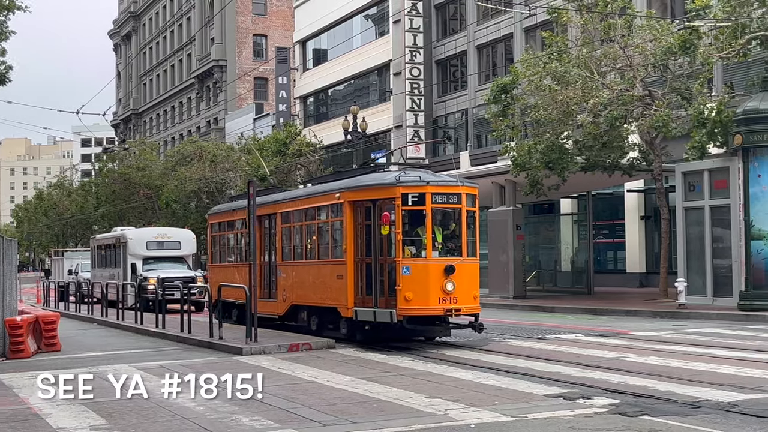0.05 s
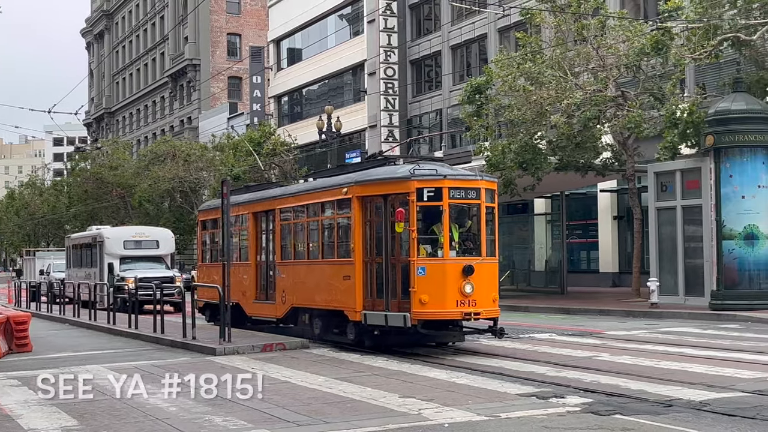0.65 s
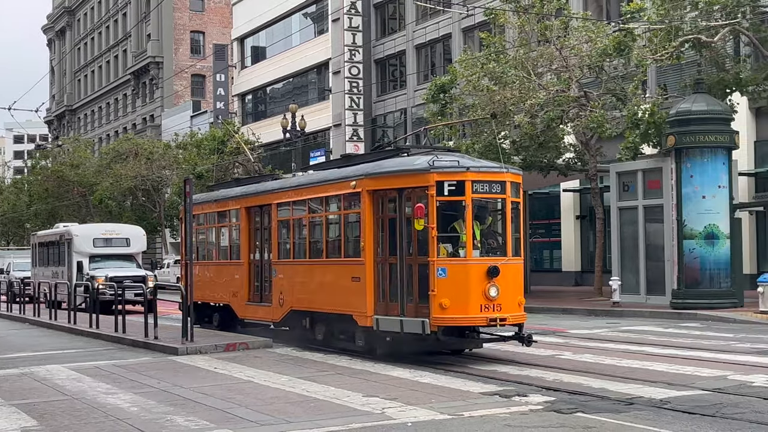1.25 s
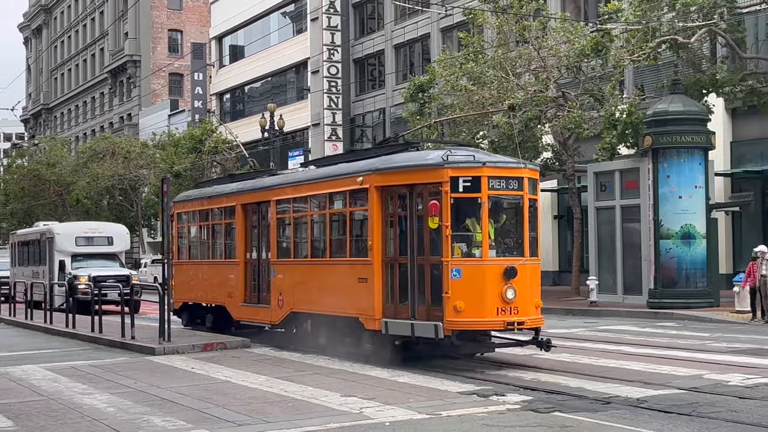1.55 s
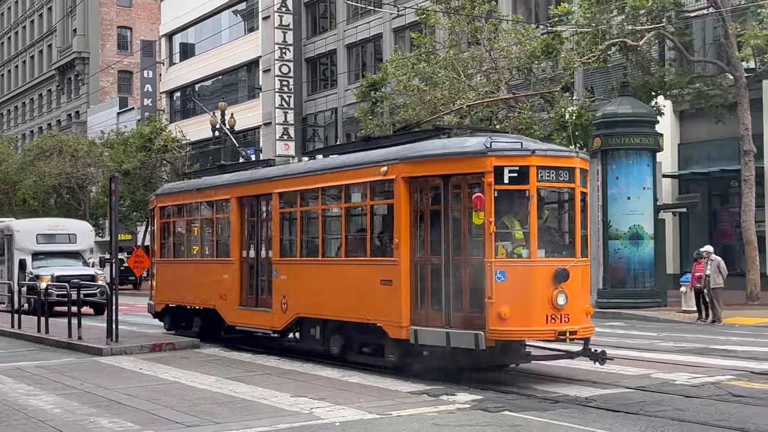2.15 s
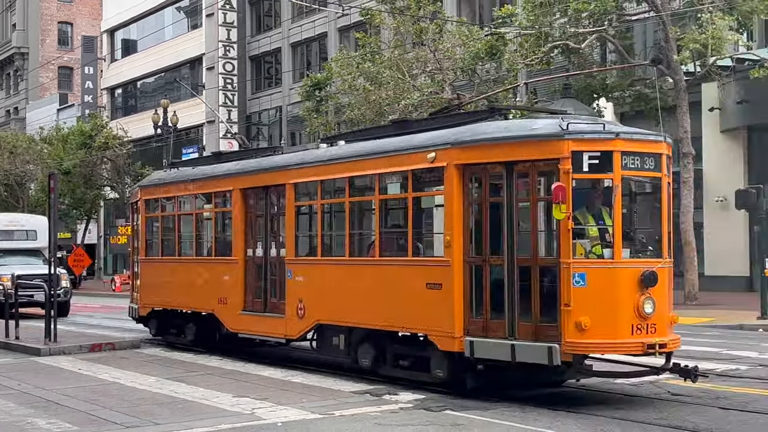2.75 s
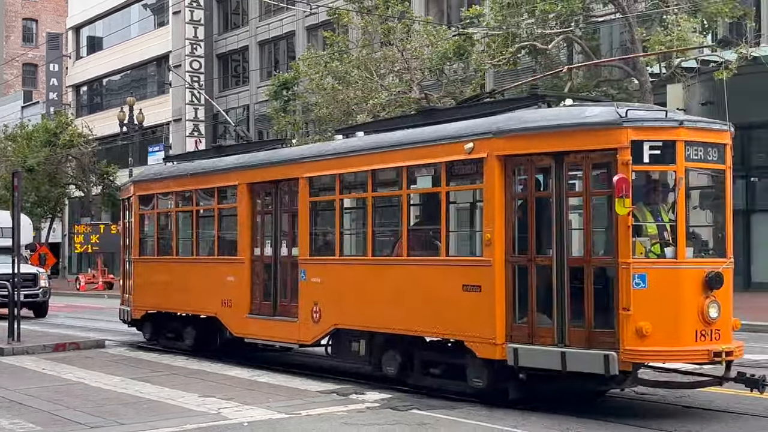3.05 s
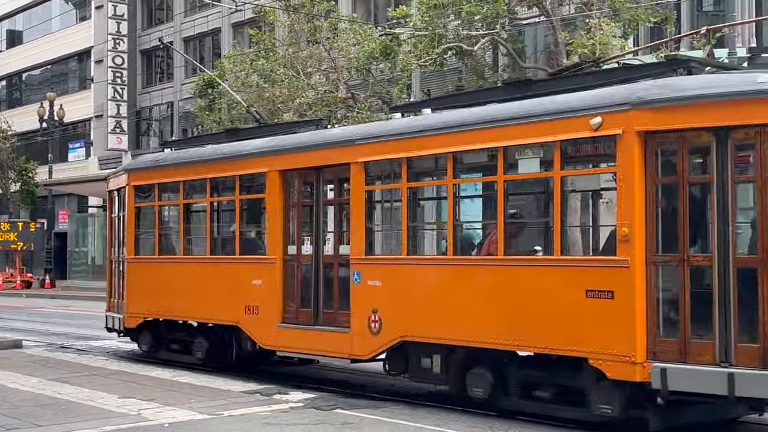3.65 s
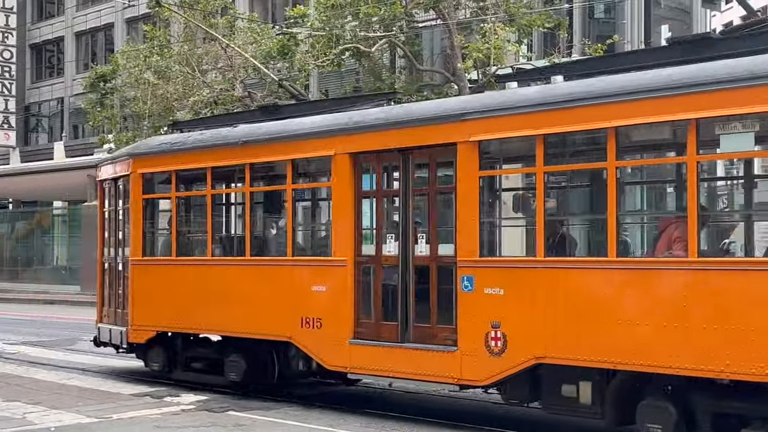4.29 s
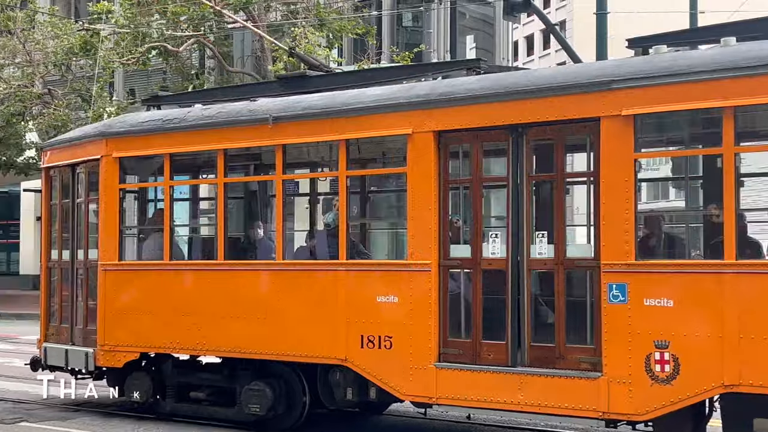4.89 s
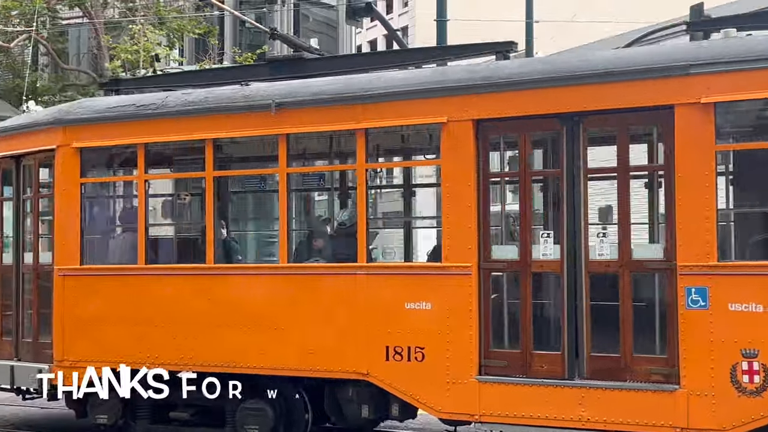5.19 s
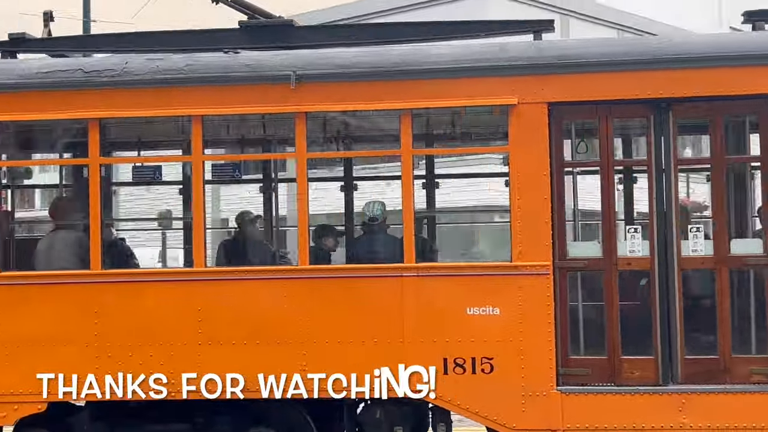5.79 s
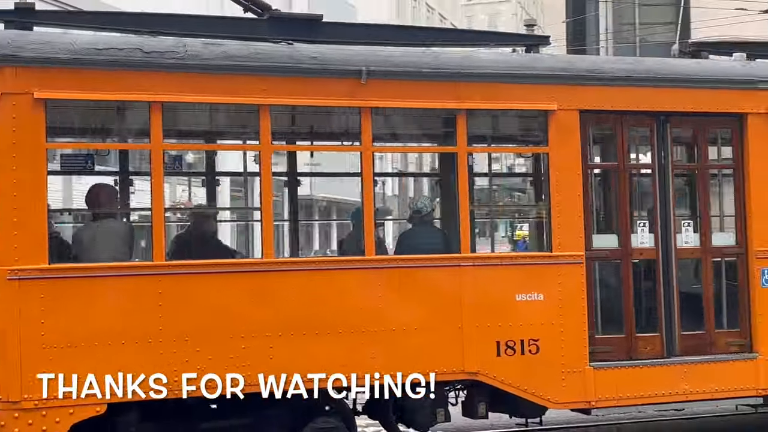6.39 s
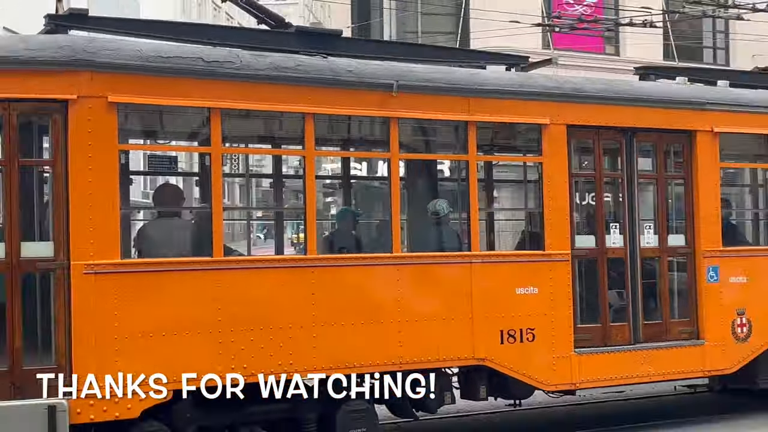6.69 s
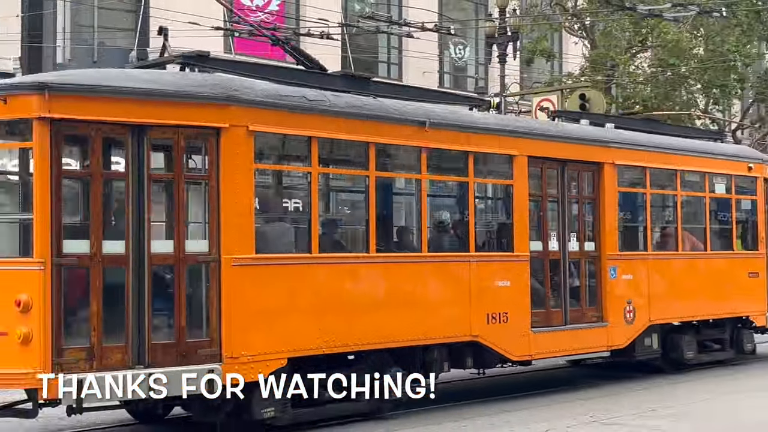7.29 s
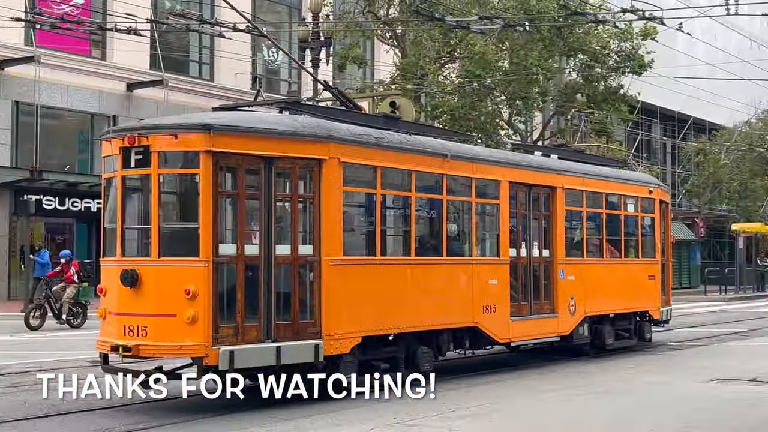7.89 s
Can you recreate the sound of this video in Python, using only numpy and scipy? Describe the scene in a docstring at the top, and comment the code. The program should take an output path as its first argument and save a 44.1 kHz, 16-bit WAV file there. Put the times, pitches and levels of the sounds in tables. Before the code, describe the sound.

Steel wheels roar, thump and clank along the rails as a humming streetcar approaches and passes on a city street.

```python
"""An old streetcar gathers speed and rolls past close by on a city street. Its rough steel wheels
roar, hiss and rattle on the rails, its body booms and bumps, and its drive hums. The wheels slam onto
loose track, grind over sand, jolt over pits and knock over rail joints; loose parts clank, and the
house fronts echo the blows. Behind it lie traffic noise, a faint, very high ticking and a few thin
squeaks of steel on steel. A microphone with two openings, left and right, listens."""
import sys
import numpy as np
from scipy import signal
from scipy.fft import rfft, irfft, next_fast_len
from scipy.io import wavfile
from scipy.ndimage import uniform_filter1d, map_coordinates

SR = 44100
rng = np.random.default_rng(int(sys.argv[2]) if len(sys.argv) > 2 else 0)


def log_audio(samples):
    """Write samples as a 16-bit WAV file to the path given in sys.argv[1]."""
    # one column per channel
    frames = np.atleast_2d(samples).T
    # limit to full scale, then quantise
    limited = np.clip(frames, -1, 1)
    pcm = np.round(limited * 32767).astype(np.int16)
    wavfile.write(sys.argv[1], SR, pcm)


N = 358974

# Levels in all tables are relative. A fade_s is the time a sound takes to fall by 60 dB.
# the tone of a blow's low thump, middle clang and high crack: pitch_hz, level_db
THUMP_TONE = [(25, -32), (60, -11), (125, 8), (220, -3), (400, -1.5), (900, -61)]
CLANG_TONE = [(150, -7.5), (350, 0.5), (700, 3), (1100, -1.5), (1700, -11.5), (2600, -23.5), (5000, -40)]
CRACK_TONE = [(700, -24), (1300, 4), (2100, 2), (3000, 3.5), (4500, -2.5), (6500, -6), (9000, -18),
              (15000, -39)]
# the car gathers speed, then coasts: time_s, speed_m_per_s
CAR_SPEED = [(0, 2.3), (3.78, 4.75), (5.1, 6.2), (6.5, 6.5), (7.2, 6.25), (8.14, 6.15)]


def amp(db):
    """Turn decibels into a number to multiply a sound by."""
    return 10 ** (np.asarray(db) / 20)


def unit(x):
    """Scale a signal to an average strength (rms) of 1."""
    return x / np.sqrt(np.mean(x ** 2) + 1e-20)


def at_pitch(points, hz):
    """Read between the rows of a (pitch_hz, value) table, with octaves evenly spaced."""
    pitches, values = np.transpose(points)
    return np.interp(np.log(hz + 1), np.log(pitches + 1), values)


def curves(rows):
    """Turn each column after the time into one value per sample."""
    times, *columns = np.transpose(rows)
    return [np.interp(np.arange(N) / SR, times, column) for column in columns]


def wobble(rate):
    """A smooth curve through `rate` random values a second."""
    return map_coordinates(rng.standard_normal(int(N * rate / SR) + 4), [np.arange(N) * rate / SR])


def filtered(x, response):
    """Multiply each frequency in x by response(hz)."""
    size = x.shape[-1]
    padded = next_fast_len(size + 1024)
    return irfft(rfft(x, padded) * response(np.fft.rfftfreq(padded, 1 / SR)), padded)[..., :size]


def add(track, start_s, sound):
    """Mix a sound into a track at start_s."""
    part = track[..., max(round(start_s * SR), 0):][..., :sound.shape[-1]]
    part += sound[..., :part.shape[-1]]


def coloured(pair, tone, ring=0):
    """Shape two noises into left and right with a given tone; ring is how much the steel resonates."""
    # resonances of the wheels, trucks (wheel frames) and rails: pitch_hz, width_hz, lift_db
    resonances = [(202, 140, 3), (381.5, 62, 3.5), (516, 17, 3), (660, 175, 3.5), (873, 113, 5.5),
                  (1034, 28, 6), (1492, 155, 8.5), (1860, 45, 1), (2420, 760, 3), (2984, 99, 5.5),
                  (4020, 360, 4.5), (5260, 260, 3)]
    # how alike left and right are: pitch_hz, likeness (0 to 1)
    likeness = [(150, 0.99), (420, 0.87), (620, 0.56), (1300, 0.33), (2000, 0.7), (2600, 0.94), (4000, 1),
                (5200, 1), (6500, 0.23), (8400, 1), (12000, 1)]

    def response(hz):
        lift_db = sum(db / (1 + ((hz - centre) / (width / 2)) ** 2) for centre, width, db in resonances)
        spread = np.arccos(np.clip(at_pitch(likeness, hz), 0, 1)) / 2
        return amp(at_pitch(tone, hz) + ring * lift_db) * [np.cos(spread), np.sin(spread)]
    mid, side = filtered(pair, response)
    return unit(np.array([mid + side, mid - side]))


def dying(pair, fades):
    """Let each frequency fade at its own speed, given rows of (pitch_hz, fade_s)."""
    hz, t, bands = signal.stft(pair, SR, nperseg=256)
    faded = bands * amp(-60 * t / at_pitch(fades, hz)[:, None])
    return signal.istft(faded, SR, nperseg=256)[1][:, :pair.shape[1]]


def grit(per_s, spread_db, life_s):
    """Countless tiny contacts of uneven size, each a burst of noise lasting about life_s."""
    contacts = rng.random(N) < per_s / SR
    sizes = contacts * amp(spread_db * np.minimum(rng.exponential(size=N), 4))
    power = signal.lfilter([1], [1, -np.exp(-1 / (life_s * SR))], sizes ** 2)
    return unit(np.sqrt(power) * rng.standard_normal((2, N)))


def patchy(pair, depth_db):
    """As the wheels turn, narrow bands of their sound grow and shrink."""
    bands = signal.stft(pair, nperseg=1024)[2]
    swells = uniform_filter1d(rng.standard_normal(bands.shape[1:]), size=2, axis=0)  # smooth over pitch
    swells = uniform_filter1d(swells, size=16, axis=1)  # and over time
    return signal.istft(bands * amp(depth_db * unit(swells)), nperseg=1024)[1][:, :N]


def blow(tone, ring, attack_s, stretch):
    """One hit sets the truck ringing as a burst of noise; stretch multiplies its fade times."""
    # how long the truck rings before stretching: pitch_hz, fade_s
    truck_fades = [(100, 0.2), (400, 0.35), (1200, 0.24), (4000, 0.21), (12000, 0.16)]
    t = np.arange(SR // 5) / SR
    burst = coloured(rng.standard_normal((2, len(t))), tone, ring)
    fades = [(hz, fade_s * stretch) for hz, fade_s in truck_fades]
    return dying(burst, fades) * (1 - np.exp(-t / attack_s))


def ringing(notes, attack_s, strongest_hz):
    """Struck steel rings its own notes, a little differently each time; rolling contact blurs them."""
    t = np.arange(SR // 4) / SR
    hz, db, fade_s = np.transpose(notes)[:, :, None]
    db = db + 6 * np.exp(-(np.log2(hz / strongest_hz) / .08) ** 2)  # lift notes near strongest_hz
    hz = hz * (1 + 0.009 * rng.standard_normal(hz.shape))  # slightly out of tune
    blur_hz = 4 + .009 * hz
    drift = np.cumsum(rng.standard_normal((len(notes), len(t))), 1) * np.sqrt(2 * np.pi * blur_hz / SR)
    phase = 2 * np.pi * (hz * t + rng.random(hz.shape)) + drift
    loudness = amp(db + 1.6 * rng.standard_normal(hz.shape) - 60 * t / fade_s)
    return (loudness * np.sin(phase)).sum(0) * (1 - np.exp(-t / attack_s))


def travelled():
    """Metres that the middle of the car has covered, at each sample."""
    return np.cumsum(curves(CAR_SPEED)[0]) / SR


def passing(falloff, doubling_db, worn_db=0):
    """The two trucks are louder when near, with each doubling of speed, and on a worn stretch of rail."""
    truck_spacing_m, mic_at_m, mic_distance_m = 7.1, 22.8, 7.3
    worn_at_m, worn_half_length_m = 18.25, 1.9
    place_m = travelled() + np.array([[.5], [-.5]]) * truck_spacing_m
    nearness = mic_distance_m / np.hypot(mic_distance_m, place_m - mic_at_m)
    on_worn_rail = np.exp(-((place_m - worn_at_m) / worn_half_length_m) ** 6)
    trucks = nearness ** falloff * amp(worn_db * on_worn_rail)
    doublings = np.log2(curves(CAR_SPEED)[0] / 6.4)  # counted from a cruising speed of 6.4 m/s
    return np.sqrt(np.mean(trucks ** 2, axis=0)) * amp(doubling_db * doublings)


def rolling():
    """Rough wheels shake the body, roar, make the rails hiss and rattle over small pits."""
    # the tone of the body's boom, the wheels' roar and their rattle: pitch_hz, level_db
    boom_tone = [(20, -36), (32, -30), (45, -12), (65, -2), (110, 1), (150, -1), (200, -1.5), (290, -11.5),
                 (600, -80)]
    roar_tone = [(70, -55), (170, -3), (300, 0), (450, -1), (610, -10.5), (800, -12), (1200, -22),
                 (2000, -39), (4000, -45)]
    rattle_tone = [(250, -19), (550, 7), (800, -3), (1300, -8), (2400, -13), (3500, -28), (8000, -42)]
    # the rails' hiss, with a gap in the top treble that is not the rails' own: pitch_hz, level_db
    hiss_with_gap = [(500, -29), (1300, 5.5), (1700, -3.5), (2100, 3), (3300, -5), (5000, -8),
                     (7000, -10.5), (9500, -33), (13000, -20), (15000, -43)]
    load = wobble(14)  # the weight on the wheels keeps changing
    boom_gain = amp(-22 + 0.74 * wobble(11))
    boom = boom_gain * coloured(grit(per_s=900, spread_db=1.8, life_s=0.0026), boom_tone, ring=0.38)
    roar_grit = patchy(grit(per_s=700, spread_db=0.85, life_s=0.014), depth_db=1.5)
    roar = amp(-18 + 1.4 * load) * coloured(roar_grit, roar_tone, ring=1.04)
    hiss_grit = patchy(grit(per_s=900, spread_db=5.1, life_s=0.019), depth_db=2)
    hiss = amp(-34 + 0.24 * load) * coloured(hiss_grit, hiss_with_gap, ring=1.5)
    rattle = amp(-44) * coloured(grit(per_s=90, spread_db=2.6, life_s=.003), rattle_tone, ring=0.94)
    return (boom * passing(falloff=0.69, doubling_db=3, worn_db=4.5)
            + roar * passing(falloff=0.82, doubling_db=7, worn_db=3.5)
            + hiss * passing(falloff=0.74, doubling_db=6.5)
            + rattle * passing(falloff=1.2, doubling_db=12, worn_db=16))


def traffic():
    """The steady wash of the city, and the unsteady drone of an engine in it."""
    # the tone of the wash: pitch_hz, level_db
    wash_tone = [(25, -28), (42, -3.5), (62, 6), (110, -3), (170, -8), (300, -17), (700, -16.5),
                 (1200, -14.5), (1750, -11.5), (2300, -22), (4000, -28), (15000, -57)]
    wash = amp(-31 + 1.1 * wobble(2.9)) * coloured(rng.standard_normal((2, N)), wash_tone)
    drone_hz = 106 + 2.28 * wobble(14)
    drone = amp(-33.5 + 3.6 * wobble(4.9)) * np.sin(2 * np.pi * np.cumsum(drone_hz) / SR)
    return wash + drone


def gear_tone(rows, width_hz):
    """A band of noise on a gliding pitch, swelling with the uneven load on the gears."""
    hz, db = curves(rows)
    flutter = wobble(width_hz) + 1j * wobble(width_hz)  # random in both strength and phase
    band = np.real(flutter * np.exp(2j * np.pi * np.cumsum(hz) / SR))
    load = amp(2 * wobble(11))
    return amp(db) * unit(load * band)


def drive():
    """The drive growls, hums and whines as the car runs up to speed."""
    # its low, middle and high tone: time_s, pitch_hz, level_db
    growl = [(2.8, 183, -45), (3.8, 203, -27), (4.6, 217, -27), (6.1, 214.7, -28), (8.14, 205.7, -36)]
    hum = [(2.4, 346.5, -54), (3.2, 377.2, -32.5), (4.6, 438.1, -29), (5.6, 455, -24.5),
           (6.5, 430.6, -29.5), (7.7, 425, -28.5), (8.14, 418, -30)]
    whine = [(1.0, 639, -70), (1.5, 646, -40), (3.0, 681, -43), (3.5, 701.4, -34), (5.4, 745, -32.5),
             (6.2, 719, -34)]
    return gear_tone(growl, width_hz=55) + gear_tone(hum, width_hz=70) + gear_tone(whine, width_hz=110)


def ticking():
    """Very high ticks, about eight a second, travel with the car and are loudest as it goes by."""
    # the pace of the ticking: time_s, ticks_per_s
    pace = [(0, 8.2), (2.3, 8.2), (3, 8.07), (4.2, 7.88), (5.2, 8.08), (8.14, 7.99)]
    # the tone of a tick: pitch_hz, level_db
    tick_tone = [(5000, -57), (9000, -37), (11000, 3.5), (12600, 3), (14000, -6), (15500, 1.5)]
    nearest_at_m, distance_m = 23.4, 8.3
    pulses, t = np.zeros(N), np.arange(SR // 10) / SR
    pulse = amp(-60 * t / 0.13) * (1 - np.exp(-t / 0.00067))
    count = np.cumsum(curves(pace)[0]) / SR - .26
    for start_s in np.flatnonzero(np.diff(np.floor(count))) / SR:  # a tick at each whole number
        add(pulses, start_s - .002, pulse)
    nearness = distance_m / np.hypot(distance_m, travelled() - nearest_at_m)
    return pulses * amp(-34.5) * nearness ** 1.9 * coloured(rng.standard_normal((2, N)), tick_tone)


def track_slams():
    """Four axles in turn hit a loose piece of track, which thumps, clanks hollowly and rebounds twice."""
    # one slam for each axle: start_s, clang_db, thump_db, crack_db, strongest_hz
    slams = [(0.243, -13.5, -20.5, -36.5, 1075), (0.85, -16, -15.5, -32, 890), (2.461, -7, -15, -26, 1130),
             (2.859, -8, -13.5, -25, 757)]
    # the notes of the loose track: pitch_hz, level_db, fade_s
    track_notes = [(92, 3.5, 0.24), (380.6, -2, 0.3), (583, -2, 0.26), (660, 4, 0.12), (747.5, -3, 0.18),
                   (877, -9, 0.19), (1128, -6, 0.18), (1680, -12.5, 0.34), (1816, -12, 0.29),
                   (1910, -16.5, 0.26)]
    rebound_s, rebound_db = .032, -9
    track = np.zeros((2, N))
    for start_s, clang_db, thump_db, crack_db, strongest_hz in slams:
        thump = blow(THUMP_TONE, ring=0.31, attack_s=0.0047, stretch=1.35)
        add(track, start_s + 0.00304, amp(thump_db + 1) * thump)
        for bounce in range(3):
            hit_s, gain = start_s - .001 + bounce * rebound_s, amp(bounce * rebound_db)
            crack = amp(crack_db) * blow(CRACK_TONE, ring=0.6, attack_s=0.00067, stretch=1)
            clang = amp(clang_db - 6) * blow(CLANG_TONE, ring=0.16, attack_s=0.0021, stretch=1.01)
            notes = amp(clang_db - 10) * ringing(track_notes, attack_s=0.0035, strongest_hz=strongest_hz)
            for sound in (crack, clang, notes):
                add(track, hit_s, gain * sound)
    return track


def street_echo(sound):
    """The house fronts throw back a late, smeared echo."""
    # how long the street rings: pitch_hz, fade_s
    street_fades = [(100, 0.45), (1000, 1), (4000, 1), (12000, 0.29)]
    even_noise = coloured(rng.standard_normal((2, SR)), [(100, 0), (10000, 0)])
    tail = dying(even_noise, street_fades)
    echo = np.zeros((2, N))
    add(echo, .03, signal.fftconvolve(sound.mean(0)[None], tail / np.linalg.norm(tail[0]), axes=1))
    return echo


def body_bumps():
    """The heavy body bumps on its springs and swings for a few cycles."""
    # the bumps: start_s, level_db
    bumps = [(1.187, -15), (2.866, -12.5), (3.104, -18), (3.41, -15.5), (5.057, -14), (7.745, -12.5),
             (7.985, -14)]
    pitch_hz, attack_s, fade_s = 70.3, 0.0066, 0.2
    track, t = np.zeros(N), np.arange(SR // 3) / SR
    swing = amp(-60 * t / fade_s) * (1 - np.exp(-t / attack_s)) * np.sin(2 * np.pi * pitch_hz * t)
    for start_s, db in bumps:
        add(track, start_s, amp(db + 3) * swing)
    return track


def sand():
    """A gritty grinding swells and fades as the wheels crush sand on the rails."""
    # the tone of the grinding: pitch_hz, level_db
    sand_tone = [(80, 2), (160, 12), (300, 3), (700, -3), (1500, -8), (3000, -20.5), (8000, -48)]
    start_s, rise_s, hold_s, fall_s = 1.22, 0.69, 0.16, 0.97
    t = np.arange(N) / SR - start_s
    rise = np.clip(t / rise_s, 0, 1)
    fall = np.clip(1 - (t - rise_s - hold_s) / fall_s, 0, 1)
    return amp(-27) * rise * fall * coloured(grit(per_s=400, spread_db=1.2, life_s=0.0054), sand_tone)


def rail_pits():
    """A pit in the rail, or a clump of sand, gives the wheel one short, dry jolt."""
    # the jolts: start_s, level_db; the first comes as the wheels crush a clump of sand, the rest at the deepest
    # pits
    pits = [(1.93, -20.5), (5.245, -18), (5.368, -17), (5.475, -15), (5.588, -17), (6.507, -20.5)]
    track = np.zeros((2, N))
    for start_s, db in pits:
        crack = amp(db - 21) * blow(CRACK_TONE, ring=1.2, attack_s=.001, stretch=.4)
        clang = amp(db) * blow(CLANG_TONE, ring=0.62, attack_s=0.0019, stretch=0.27)
        thump = amp(db + 4) * blow(THUMP_TONE, ring=0.63, attack_s=.002, stretch=0.45)
        add(track, start_s, crack + clang + thump)
    return track


def squeaks():
    """Each slip of steel on steel sings a brief, rough, falling tone."""
    # the slips: start_s, level_db
    slips = [(2.61, -46), (2.705, -45), (2.873, -49), (3.65, -52), (3.91, -46), (4.05, -49), (4.531, -52)]
    pitch_hz, fall_hz, length_s = 13450, 700, .05
    track, progress = np.zeros(N), np.linspace(0, 1, int(length_s * SR))
    for start_s, db in slips:
        glide_hz = pitch_hz + 120 * rng.standard_normal() - fall_hz * progress
        rough_hz = glide_hz + 900 * rng.standard_normal(SR)[:len(progress)]
        tone = np.sin(2 * np.pi * np.cumsum(rough_hz) / SR)
        add(track, start_s, amp(db) * np.sin(np.pi * progress) * tone)
    return track


def rail_joints():
    """Each wheel cracks on the rail end, the steel clangs and rings, and the truck lands with a thump."""
    # the knocks, mostly in pairs: start_s, clang_db, thump_db, crack_db, strongest_hz
    knocks = [(3.727, -22, -9.5, -42, 2310), (3.84, -20.5, -8, -43, 1690), (4.156, -24, -9.5, -40, 2955),
              (5.057, -17.5, -12.5, -38, 2310), (5.143, -18.5, -9.5, -33, 2310),
              (5.319, -20, -13, -37, 2955), (5.409, -19.5, -12.5, -37, 1055), (5.815, -13.5, -8, -28, 1055),
              (5.901, -14.5, -7.5, -26.5, 1210), (6.063, -12.5, -8.5, -26, 3150),
              (6.149, -16, -7.5, -31, 2120), (6.898, -14.5, -9, -29, 1830), (6.98, -13.5, -9, -24.5, 1055),
              (7.142, -13, -9, -23.5, 4230), (7.226, -15.5, -8.5, -24, 2310), (7.887, -21, -11, -37, 1690),
              (7.972, -20.5, -17, -33.5, 2955)]
    # the notes of a struck wheel with its truck: pitch_hz, level_db, fade_s
    wheel_notes = [(527, 1, .33), (1055, -4, .2), (1210, -7, .16), (1690, -9.5, .18), (1830, -7, .18),
                   (2120, -11, .18), (2310, -11, .24), (2955, -15, .24), (3150, -16, .18), (4230, -19, .24)]
    landing_note = [(132, 0, .13)]  # the truck drops onto the rail; same columns
    track = np.zeros((2, N))
    for start_s, clang_db, thump_db, crack_db, strongest_hz in knocks:
        crack = amp(crack_db) * blow(CRACK_TONE, ring=.9, attack_s=.001, stretch=.9)
        clang = amp(clang_db) * blow(CLANG_TONE, ring=0.33, attack_s=0.001, stretch=.8)
        wheel = amp(clang_db - 7) * ringing(wheel_notes, attack_s=0.0029, strongest_hz=strongest_hz)
        thump = amp(thump_db - 3) * blow(THUMP_TONE, ring=0.59, attack_s=0.0014, stretch=0.85)
        landing = amp(thump_db) * ringing(landing_note, attack_s=0.0027, strongest_hz=strongest_hz)
        for early_s, sound in ((.002, crack), (.001, clang), (.001, wheel), (0, thump), (0, landing)):
            add(track, start_s - early_s, sound)
    return track


def loose_parts():
    """A loose steel part strikes the truck and rings briefly at its own pitch."""
    # the clanks: start_s, blow_db, ring_db, pitch_hz
    clanks = [(6.338, -21, -29, 1810), (7.724, -17, -34.5, 2110)]
    track, fade_s = np.zeros((2, N)), 0.12
    for start_s, blow_db, ring_db, hz in clanks:
        crack = amp(blow_db - 17) * blow(CRACK_TONE, ring=1.1, attack_s=.001, stretch=1.9)
        clang = amp(blow_db + 1) * blow(CLANG_TONE, ring=0.26, attack_s=0.001, stretch=0.56)
        add(track, start_s, crack + clang)
        add(track, start_s, amp(ring_db) * ringing([(hz, 0, fade_s)], attack_s=.001, strongest_hz=hz))
    return track


def scene():
    """The streetcar and the echo of its knocks, over the city traffic."""
    knocks = rail_joints() + rail_pits() + track_slams() + loose_parts()
    running = drive() + rolling() + sand()
    echo = amp(-11) * street_echo(knocks)
    return running + knocks + echo + body_bumps() + ticking() + squeaks() + traffic()


def record(dry):
    """The microphone's openings differ in level and phase; tall peaks are rounded, the top treble cut."""
    # how much louder the left is than the right: pitch_hz, level_db
    left_louder = [(60, 0.3), (160, -1), (280, -2.3), (440, -0.3), (720, 3.5), (1190, -2.2), (1800, -5.3),
                   (3000, 0)]
    # how far the left wave runs ahead of the right: pitch_hz, phase_radians
    left_ahead = [(200, 0), (400, .4), (560, .85), (700, .1), (1100, .6), (1380, 3), (1620, 3.1),
                  (1700, .6), (2100, .1), (5300, 0), (6700, -1.2), (8000, -3.1), (8900, -3.15),
                  (11100, -6.2), (12700, -6.3), (14600, -9.4)]
    ceiling, top_hz = .97, 15000

    def openings(hz):
        left = amp(at_pitch(left_louder, hz) / 2) * np.exp(.5j * at_pitch(left_ahead, hz))
        return np.array([left, 1 / left])
    heard = filtered(dry, openings)
    rounded = heard / (1 + np.abs(heard / ceiling) ** 8) ** (1 / 8)
    return filtered(rounded, lambda hz: hz < top_hz)


dry = scene()
out = record(dry)
log_audio(out)
```